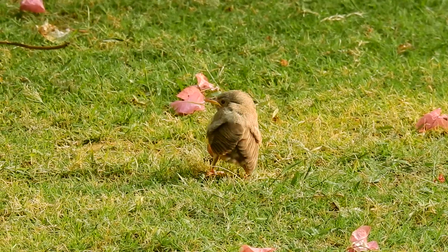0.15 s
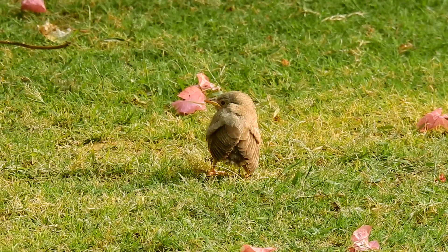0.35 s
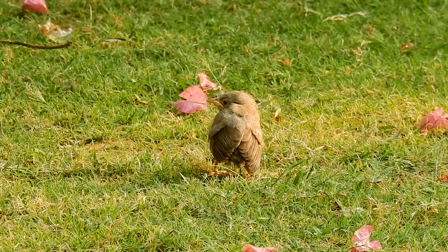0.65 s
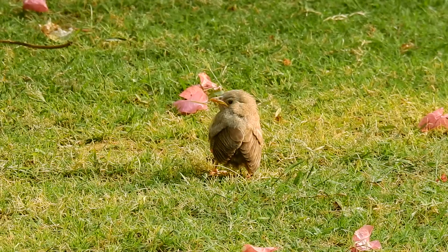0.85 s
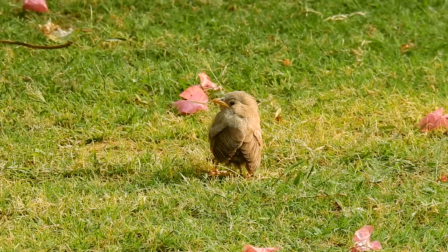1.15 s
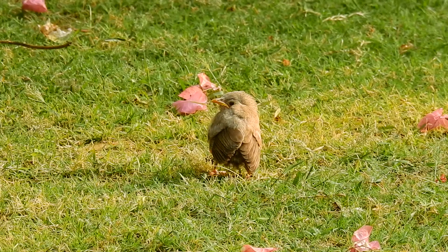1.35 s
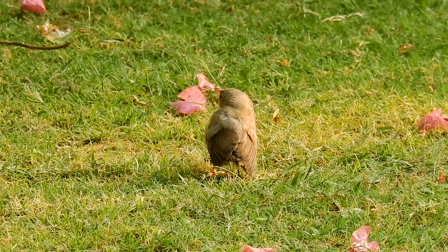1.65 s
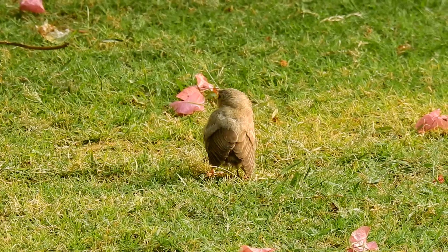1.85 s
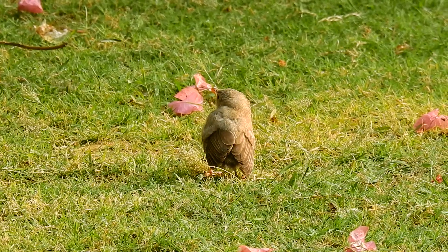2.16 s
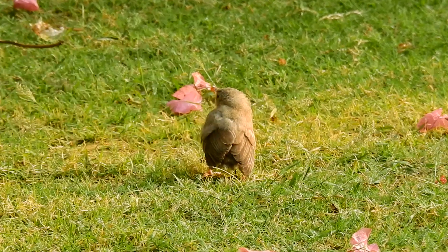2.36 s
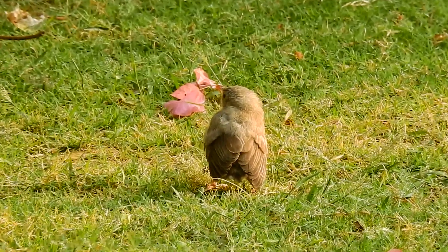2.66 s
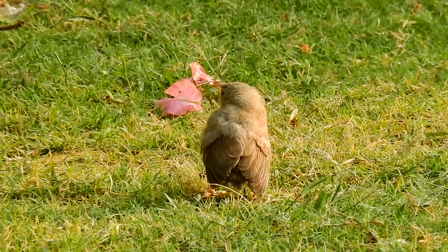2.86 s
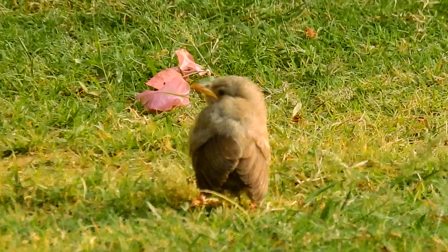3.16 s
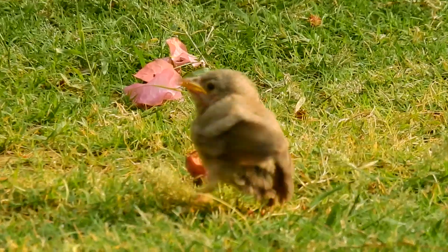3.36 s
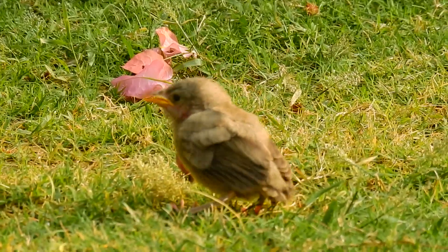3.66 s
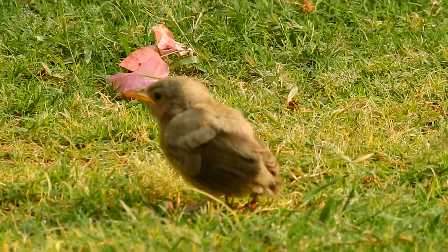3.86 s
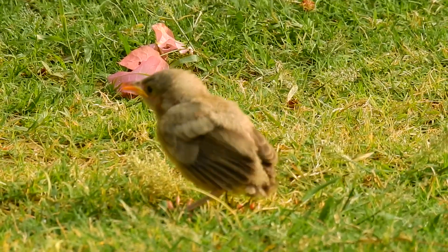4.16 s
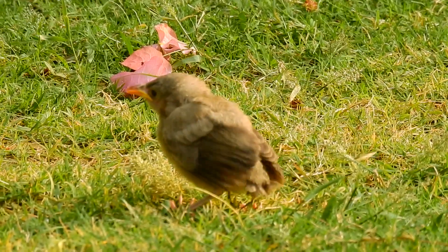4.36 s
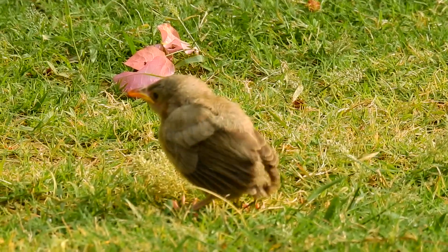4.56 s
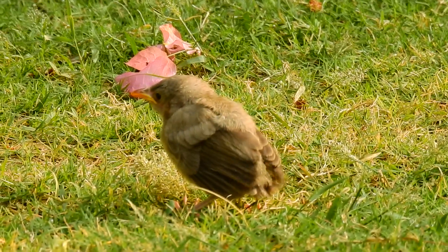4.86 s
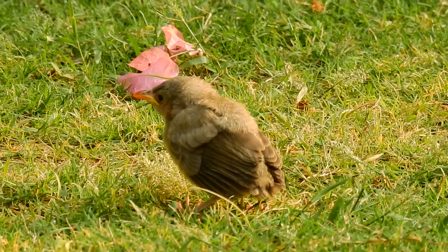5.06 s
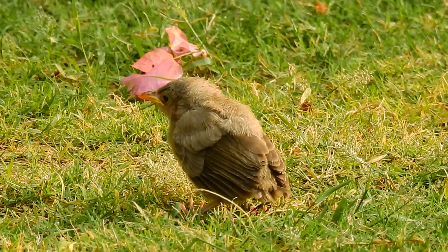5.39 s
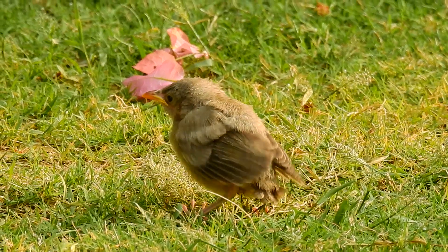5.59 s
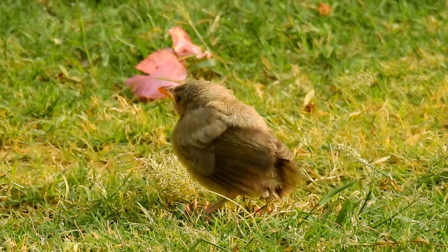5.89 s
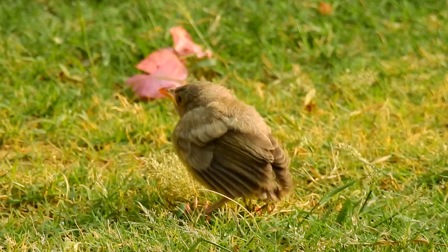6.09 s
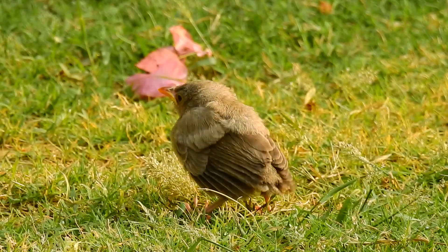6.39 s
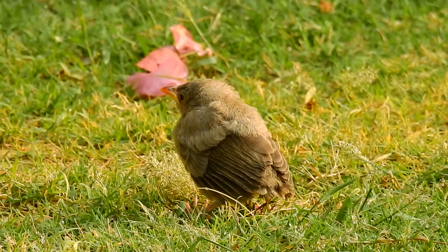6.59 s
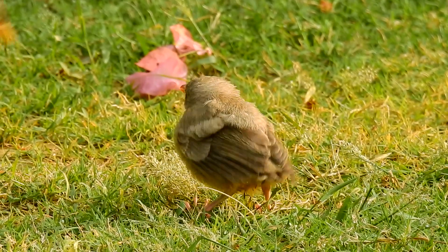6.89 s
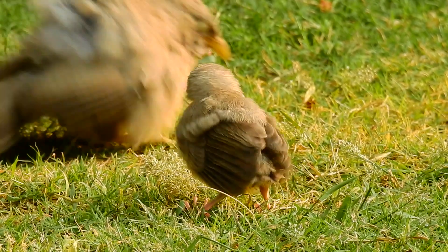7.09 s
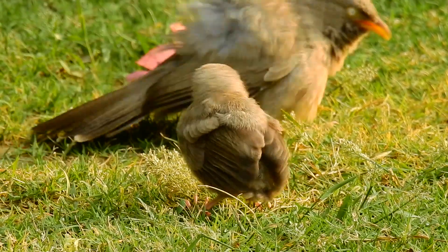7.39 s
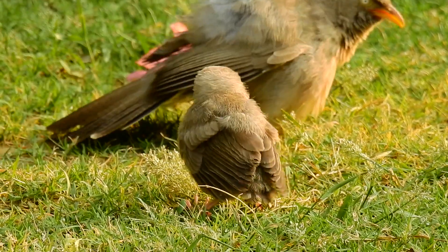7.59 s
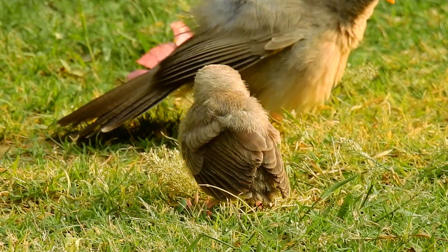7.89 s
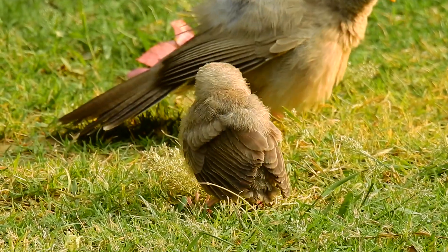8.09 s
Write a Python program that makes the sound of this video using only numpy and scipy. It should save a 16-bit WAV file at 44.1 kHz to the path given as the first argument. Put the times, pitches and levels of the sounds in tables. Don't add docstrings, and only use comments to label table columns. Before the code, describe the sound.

A garden with a small flock of babblers, over steady soft leaf hiss and a low town hum with faint engine swells; short echoes from walls and trees follow the calls. A faint thin whistle falls at 0.1 s, dry knocks click around 0.4-0.6, and a clearer whistle slides down at 0.7. Hoarse far crows and shrill buzzy chirps come at 0.9-1.4. A heavy low bump at 1.6 starts raspy scolding and quick chirps until 2. Lighter chirps and a strong falling whistle follow at 2.4-3.3. A nasal squawk at 3.4 leads to harsh swelling rasps, loudest at 3.7, then more at 4.05 and 4.3. Squawk, scold and whistle overlap near 4.9-5.3. It thins, with faint rustles, until a strong whistle at 6.5. At 7.0 a loud cry breaks into rasp, a sharp pip, chatter and grumbles, fading with faint whistles by 8.2.

```python
import sys
import numpy as np
from scipy import signal
from scipy.fft import rfft, irfft, next_fast_len
from scipy.io import wavfile
from scipy.ndimage import uniform_filter1d

SR = 44100
rng = np.random.default_rng(int(sys.argv[2]) if len(sys.argv) > 2 else 0)


def natural_amplitude(level_db):
    exponent = np.asarray(level_db, float) / 20
    return 10 ** exponent


def transcribe(signal):
    frames = np.atleast_2d(signal).T
    limited = np.clip(frames, -1, 1)
    pcm = np.round(limited * 32767).astype(np.int16)
    wavfile.write(sys.argv[1], SR, pcm)


N = 363384

# start_s, length_s, start_hz, end_hz, level_db
WHISTLES = [(0.086, 0.23, 3970, 3452, -50), (0.699, 0.33, 4048, 3390, -38.5),
            (2.591, .17, 3910, 3267, -44.5), (2.795, 0.36, 4120, 3375, -35.5),
            (5.316, 0.071, 3950, 3600, -54), (4.97, .36, 3953, 3330, -37), (5.42, .2, 3810, 3512, -46.5),
            (5.776, 0.11, 3820, 3420, -54.5), (6.219, .24, 3784, 3420, -55.5),
            (6.526, 0.42, 4040, 3326, -36), (7.484, .31, 3955, 3520, -47.5), (7.977, 0.23, 3747, 3380, -47)]
# start_s, length_s, start_hz, end_hz, level_db
BUZZES = [(7.42, .25, 2745, 2452, -44), (4.065, .11, 3050, 3200, -34), (4.345, .115, 3300, 3050, -35),
          (3.755, .09, 3250, 3500, -31), (7.35, .07, 3700, 3300, -38), (4.885, .07, 3700, 3400, -38),
          (.985, 0.094, 5610, 5870, -31.5), (1.015, 0.058, 7050, 7100, -45),
          (1.261, 0.11, 5590, 6220, -28.5), (2.345, .11, 5790, 5240, -36.5),
          (3.048, 0.058, 4414, 5090, -34.5), (3.79, .1, 11030, 11400, -56.5),
          (6.579, .12, 5360, 5940, -38.5), (7.803, 0.068, 4690, 5680, -48)]
# start_s, length_s, start_hz, end_hz, level_db
CHIRPS = [(1.885, 0.046, 4340, 4150, -42), (1.642, 0.09, 2500, 2445, -38.5), (8.05, .14, 2350, 2150, -54),
          (1.66, .14, 5000, 5200, -49), (4.93, 0.18, 2438, 2420, -41.5), (1.752, .045, 3000, 3200, -34),
          (1.775, .06, 3450, 3600, -36), (2.732, .064, 4510, 5050, -34), (2.768, .11, 4500, 4480, -43.5),
          (3.074, .082, 5130, 5280, -36.5), (3.076, .057, 4800, 4700, -44), (3.967, .08, 2880, 2950, -42),
          (4.265, 0.072, 2820, 2870, -45.5), (4.913, .12, 4510, 5260, -39.5),
          (5.99, 0.026, 5080, 4760, -51.5), (6.013, .073, 6500, 6380, -46.5), (6.473, .05, 2580, 2857, -41),
          (6.845, .045, 5000, 5220, -51.5), (7.35, .2, 2520, 2430, -39), (7.344, .12, 3570, 2810, -38.5),
          (7.37, .1, 3050, 2750, -41), (7.441, 0.26, 2165, 1960, -45)]
# start_s, length_s, start_hz, end_hz, level_db
GLIDES = [(2.41, .2, 3200, 3180, -46.5), (2.485, .05, 3220, 3200, -36), (7.008, .03, 8800, 7650, -50.5),
          (7.158, .035, 4280, 4470, -24), (6.66, .05, 6250, 6300, -46.5), (4.05, .15, 4400, 4350, -48),
          (3.52, .055, 2440, 2420, -35), (3.53, .05, 3350, 3250, -35), (4.51, .135, 3900, 3100, -42),
          (4.52, .08, 7600, 6500, -56), (1.57, .04, 6900, 6500, -56), (1.555, 0.04, 3520, 3400, -48),
          (1.585, .03, 3400, 3150, -40), (1.602, 0.068, 2060, 1973, -38), (1.595, 0.039, 1060, 1020, -43.5),
          (3.6, 0.095, 2450, 1883, -40), (3.62, .1, 3900, 3800, -42), (1.297, .04, 3640, 3260, -49.5),
          (1.77, 0.083, 2560, 2415, -36), (1.85, .091, 3580, 3770, -43.5), (1.905, 0.069, 2300, 2156, -41),
          (2.45, 0.18, 3904, 3820, -44.5), (2.543, 0.036, 4300, 5380, -47.5),
          (3.031, 0.043, 4100, 4480, -34), (3.229, 0.038, 2620, 2750, -46.5),
          (3.259, 0.065, 3610, 3760, -48), (4.48, .056, 5000, 5000, -46.5),
          (4.938, 0.11, 4140, 4020, -41.5), (5.148, .075, 2595, 2500, -37), (5.165, .03, 2400, 2400, -35),
          (7.006, 0.031, 4700, 3900, -35.5), (7.858, 0.046, 1724, 1466, -48.5)]
# start_s, length_s, pitch_hz, level_db
PIPS = [(1.713, 0.18, 5990, -50.5), (1.893, 0.06, 1702, -44.5), (2.412, 0.2, 3565, -44),
        (2.717, 0.037, 4430, -34.5), (2.755, 0.085, 5150, -33), (3.31, 0.099, 5500, -46.5),
        (3.81, .03, 1420, -40.5), (4.019, .067, 1606, -44.5), (4.872, 0.035, 2432, -38.5),
        (5.121, .027, 3675, -35), (5.318, .015, 1720, -48), (6.411, 0.071, 2387, -45.5),
        (6.5, 0.057, 2095, -46.5), (7.298, 0.05, 2485, -37), (7.328, .04, 2490, -29)]
# start_s, length_s, effort_db, brightness_db, pitch_hz
SQUAWKS = [
    (3.44, 0.12, -28, -16, 1246),
    (4.875, .085, -35, -18, 1226),
]
# start_s, length_s, effort_db, brightness_db, pitch_hz
CRIES = [
    (7.015, .15, -28.5, -17, 1274),
]
# start_s, length_s, effort_db, brightness_db, pitch_hz
GRUMBLES = [
    (7.33, 0.12, -35.5, -25.5, 620),
    (8.04, 0.13, -51, -37, 904),
]
# start_s, length_s, effort_db, brightness_db, throat_factor [ratio]
RASPS = [
    (7.08, .13, -33.5, -10.5, 1.02),
    (3.525, .09, -35, -17, 1.01),
    (3.6, 0.16, -36, -19.5, 0.93),
    (3.72, .21, -24, -9.5, 1.042),
    (4.045, 0.13, -30, -14, 0.984),
    (4.325, 0.135, -32, -12, 1.02),
]
# start_s, length_s, effort_db, brightness_db, throat_factor [ratio]
SCOLDS = [
    (.355, 0.034, -39.5, -11, 0.95),
    (1.645, 0.12, -33, -16.5, 0.87),
    (1.76, 0.1, -35, -23, 1.07),
    (1.86, 0.093, -40, -25, 0.99),
    (4.915, .13, -33.5, -21, 1.1),
]
# start_s, length_s, effort_db, brightness_db, throat_factor [ratio]
MUTTERS = [
    (3.97, .08, -49, -31, 0.6),
    (4.27, 0.044, -55, -28, .88),
]
# frequency_hz, level_db
THROAT = [(800, -24), (1250, -21), (1800, -15.5), (2200, -7.5), (2500, -2), (2850, -4), (3300, 0.5),
          (3950, -5.5), (4450, -7), (5100, -20.5), (6000, -19.5), (6800, -10), (7600, -30), (8400, -50.5),
          (14000, -81)]
# start_s, length_s, pitch_hz, level_db, first_overtone_db
CAWS = [(0.921, 0.086, 597, -30, -13.5), (0.995, 0.044, 707, -39, -7), (1.042, 0.055, 602, -31.5, -31),
        (1.17, .044, 558, -41, 0.3), (1.2, 0.1, 670, -43, -0.5), (1.261, .07, 639, -41.5, -11),
        (1.099, 0.058, 620, -46.5, -7), (1.345, 0.11, 619, -56.5, 6.5), (2.601, .45, 923, -55.5, -30),
        (3.292, .038, 910, -42.5, -27), (5.55, 0.071, 527, -51, 7), (5.632, 0.071, 546, -52, 6)]
# start_s, level_db, centre_hz, width_hz, t60_s
KNOCKS = [(.358, -37, 1434, 388, 0.12), (.372, -28, 1480, 300, 0.08), (.372, -32, 4290, 895, 0.094),
          (.365, -38.5, 717, 700, 0.11), (.58, -38.5, 6350, 3060, 0.19), (0.582, -37.5, 2625, 1200, 0.063),
          (0.635, -30, 2070, 1290, 0.035), (0.643, -42.5, 2100, 1320, 0.039),
          (0.469, -45, 3950, 4960, 0.13), (1.484, -40, 6000, 3500, 0.05), (1.486, -30, 2750, 450, 0.03),
          (1.49, -36, 4250, 500, 0.04), (1.638, -20, 600, 330, 0.03), (1.644, -17, 480, 300, 0.03),
          (1.652, -24, 520, 300, 0.07), (1.644, -32, 7070, 1290, 0.067), (1.642, -30, 4500, 900, 0.043),
          (3.299, -56, 8960, 4460, 0.13), (4.858, -46.5, 10150, 3600, 0.12), (5.1, -59.5, 9300, 3030, 0.12),
          (5.211, -53.5, 9800, 1980, 0.032), (5.53, -63, 4400, 2010, 0.048),
          (5.634, -43.5, 8160, 4480, 0.041), (6.184, -45, 7780, 4430, 0.084),
          (6.27, -59, 10300, 2900, 0.04), (6.799, -49.5, 9900, 3440, 0.088)]
# peak_s, level_db, half_length_s
REVS = [(.49, -52, 0.036), (0.67, -48.5, 0.088), (1.395, -43, 0.086), (1.736, -35.5, 0.027),
        (1.962, -37, 0.13), (2.431, -36.5, 0.098), (2.756, -46, 0.13), (3.04, -45, 0.16),
        (5.104, -55.5, 0.63), (5.84, -53, 0.088), (6.094, -56, .05), (6.799, -54, 0.5), (7.453, -57, 0.18),
        (8.12, -59, 0.051)]
# frequency_hz, level_db [dB per Hz]
HISS = [(29, -48.5), (50, -19.5), (91, -7.5), (139, -13.5), (180, 3), (306, -8), (605, -10), (815, -14.5),
        (1790, -17), (3550, -21), (6720, -20.5), (8140, -29.5), (10000, -46), (14500, -56)]
# time_s, level_db
BREEZE = [(0.0, -57), (0.99, -55), (1.12, -52.5), (1.4, -52.5), (1.9, -52), (2.27, -54.5), (3.1, -52),
          (3.51, -53), (3.72, -52.5), (4.8, -54.5), (5.69, -53), (5.9, -58), (6.33, -57.5), (7.14, -53.5),
          (8.24, -55.5)]
# frequency_hz, t60_s
GARDEN = [(300, 0.17), (2000, 0.22), (4500, 0.29), (8000, 0.15)]
# frequency_hz, likeness [0-1]
SAME = [(60, 0.97), (160, 1.0), (420, 0.98), (1100, 0.99), (2910, 0.85), (7690, 0.051)]
# frequency_hz, left_minus_right_db
TILT = [(60, -2.5), (160, 0.5), (420, 0.0), (1100, -2.5), (2910, -3.5), (7690, -1)]

NASAL = dict(throat=1.043, kept=.87, hold=.3, rough_start=.22, rough_end=.8, drift=.98,
             peak=.54, start_db=-14, end_db=-9, dull_db=-4)
CRY = dict(throat=1.163, kept=.84, hold=.37, rough_start=.06, rough_end=.8, drift=.95,
           peak=.62, start_db=-7.5, end_db=-4, dull_db=-8)
GRUMBLE = dict(throat=.94, kept=.88, rough_start=.3, rough_end=1, drift=.8,
               peak=.17, start_db=4, end_db=-13, dull_db=0)
RASP = dict(start_hz=567, kept=.95, rough_start=.66, rough_end=.97, drift=1.003,
            peak=.58, start_db=-10, end_db=-33, dull_db=-42)
SCOLD = dict(start_hz=516.4, kept=.94, rough_start=.8, rough_end=.67, drift=.884,
             peak=.23, start_db=-4, end_db=-7, dull_db=-4)
MUTTER = dict(start_hz=727, kept=1.2, rough_start=.35, rough_end=.6, drift=1.6,
              peak=.3, start_db=-1, end_db=-3, dull_db=6)

BUZZ_HZ, CHIRP_HZ, GLIDE_HZ, PIP_HZ = 497, 190, 85, 45
TOP_HZ = 8600
ECHO_DB, IDLE_DB = -4, -59.5
STARVE_DB, STARVE_HZ, SPARE_DB = -51, 8100, 16


def whistle(start_s, length_s, start_hz, end_hz, level_db):
    u = np.arange(0, 1, 1 / (length_s * SR))
    hz = start_hz + (end_hz - start_hz) * u ** .72
    shake_hz = np.interp(u, [0, .58, 1], [190, 40, 110])
    shake = np.sin(turns(115 + 25 * wobble(len(u), 14.8).real))
    angle = turns(hz + shake_hz * shake)
    flutter = .85 + .45 * wobble(len(u), 50)
    octave = natural_amplitude(-26.5 + .57 * (level_db + 44) - 9 * u)
    tone = flutter * (np.exp(1j * angle) + octave * np.exp(2j * angle))
    swell_db = arch(u, .6, -10, -9.5)
    return start_s, natural_amplitude(level_db + swell_db) * evened(tone.real) * signal.windows.tukey(len(u), .16)


def note(start_s, length_s, start_hz, end_hz, level_db, trill_hz):
    hz, swell = glide(length_s, start_hz, end_hz, early=.8 - .00039 * trill_hz)
    shake = swell * np.sin(turns(330 + 60 * wobble(len(hz), 60).real))
    flutter = .72 + .52 * wobble(len(hz), 70 + .25 * trill_hz)
    tone = np.exp(1j * turns(hz + trill_hz * shake)) * flutter
    return start_s, natural_amplitude(level_db) * swell * evened(tone.real)


def squawk(start_s, length_s, effort_db, bright_db, start_hz, throat, kept, rough_start, rough_end, drift,
           peak, start_db, end_db, dull_db, hold=.3):
    t = np.arange(0, length_s, 1 / SR)
    u = t / length_s
    effort_db = effort_db + arch(u, peak, start_db, end_db)
    bright_db = bright_db + arch(u, peak, dull_db, dull_db / 2)
    fall = np.sin(np.pi / 2 * np.clip((u - hold) / .45, 0, 1)) ** 2
    hz = start_hz * (1 + (kept - 1) * fall) * (1 + .007 * wobble(len(t), 25).real)
    rough = np.clip(rough_start + (rough_end - rough_start) * u, 0, 1)
    throat = throat * drift ** (2 * u - 1)
    angle, voice = turns(hz), 0
    for k in range(1, int(TOP_HZ / hz.min())):
        clear = np.sqrt(1 - rough) * (1.06 + .5 * wobble(len(t), 27))
        rasp = np.sqrt(rough) * wobble(len(t), 210) * natural_amplitude(2.5 * wobble(len(t), 30).real)
        lift_db = (bright_db + 16.5) * np.clip(k * hz / 2000 - 2, 0, 1)
        overtone = ((clear + rasp) * np.exp(1j * k * angle)).real
        voice = voice + natural_amplitude(read(THROAT, k * hz / throat) + lift_db) * overtone
    gusts = (.4 * wobble(len(t), 60) + .8 * wobble(len(t), 260)).real
    puffs = evened(natural_amplitude(6 * rough * np.tanh(gusts)))
    edges = signal.windows.tukey(len(t), .3)
    return start_s, natural_amplitude(effort_db) * voice * np.sqrt(hz / 1200) * puffs * edges


def caw(start_s, length_s, start_hz, level_db, second_db):
    hz, swell = glide(length_s, start_hz, 1.035 * start_hz)
    angle, voice = turns(hz), 0
    for k, overtone_db in enumerate([0, second_db, second_db - 16.5], 1):
        hoarse = .45 + .9 * wobble(len(hz), 60 * k)
        voice = voice + natural_amplitude(overtone_db) * np.exp(1j * k * angle) * hoarse
    return start_s, natural_amplitude(level_db) * swell * voice.real


def knock(start_s, level_db, hz, width_hz, t60_s):
    t = np.arange(0, .15, 1 / SR)
    same = np.clip(read(SAME, hz), -1, 1)
    left = wobble(len(t), width_hz / 2)
    right = same * left + np.sqrt(1 - same ** 2) * wobble(len(t), width_hz / 2)
    grit = [left, right] * np.exp(2j * np.pi * hz * t)
    return start_s, natural_amplitude(level_db - 60 * t / t60_s) * np.minimum(t / .0019, 1) * grit.real


def hum():
    t = np.arange(N) / SR
    hz = 165 + 4 * wobble(N, 1.5).real
    level = natural_amplitude(IDLE_DB)
    for peak_s, level_db, half_s in REVS:
        level = level + natural_amplitude(level_db) * np.exp(-((t - peak_s) / half_s) ** 2)
    return level * evened((wobble(N, 21) * np.exp(1j * turns(hz))).real)


def hiss():
    frames, hz = N // 512 + 5, np.fft.rfftfreq(1024, 1 / SR)
    a, b, c, d, patches = rng.standard_normal((frames, 513, 5)).T
    patches = evened(uniform_filter1d(uniform_filter1d(patches, 14, 0), 10, 1))
    same = np.clip(read(SAME, hz), -1, 1)[:, None]
    left = a + 1j * b
    z = np.array([left, same * left + np.sqrt(1 - same ** 2) * (c + 1j * d)])
    z *= natural_amplitude(read(HISS, hz)[:, None] + 2.58 * patches)
    noise = signal.istft(z, nperseg=1024, noverlap=512)[1][:, :N]
    swell_db = np.interp(np.arange(N) / SR, *np.transpose(BREEZE))
    return natural_amplitude(swell_db + 6) * evened(noise)


def placed(start_s, sound):
    side = rng.uniform(-1, 1)
    late = np.sinc(np.arange(-8, 9) - .8 * side * np.array([[1], [-1]]))
    level = natural_amplitude(1.7 * side * np.array([[-1], [1]]))
    return start_s - 8 / SR, signal.oaconvolve(sound[None], late, axes=1) * level


def garden(x):
    taps = np.zeros((2, SR))
    at = np.arange(300, SR - 20, 20) + rng.integers(0, 20, (2, (SR - 301) // 20))
    np.put_along_axis(taps, at, rng.choice([-1., 1.], at.shape), 1)
    hz, t, z = signal.stft(taps, SR, nperseg=256)
    same = np.clip(read(SAME, hz), -1, 1)[:, None]
    z[1] = same * z[0] + np.sqrt(1 - same ** 2) * z[1]
    decay = natural_amplitude(-60 * t / read(GARDEN, hz)[:, None])
    tail = signal.istft(z * decay, SR, nperseg=256)[1]
    return signal.fftconvolve(x[None], tail / np.linalg.norm(tail[0]), axes=1)[:, :N]


def glide(length_s, start_hz, end_hz, early=.8):
    u = np.arange(0, 1, 1 / (length_s * SR))
    swell = np.sin(np.pi * u ** early) ** 1.2
    return start_hz + (end_hz - start_hz) * np.sin(np.pi / 2 * u) ** 1.1, swell


def arch(u, peak, start, end):
    peak = np.clip(peak, .05, .95)
    return np.where(u < peak, start * (1 - u / peak) ** 2, end * ((u - peak) / (1 - peak)) ** 2)


def wobble(count, hz):
    size = next_fast_len(count + 600)
    z = rng.standard_normal((size, 2)) @ [1, 1j]
    bell = np.exp(-.5 * (np.fft.fftfreq(size, 1 / SR) / hz) ** 2)
    return evened(np.fft.ifft(z * bell))[:count]


def turns(hz):
    return 2 * np.pi * np.cumsum(hz) / SR


def evened(x):
    return x / np.sqrt(np.mean(abs(x) ** 2) + 1e-20)


def read(points, hz):
    f, value = np.transpose(points)
    return np.interp(np.log(hz + 1), np.log(f + 1), value)


def add(mix, start_s, sound):
    part = mix[..., round(start_s * SR):][..., :sound.shape[-1]]
    part += sound[..., :part.shape[-1]]


def scene():
    calls = [whistle(*row) for row in WHISTLES]
    calls += [note(s, length_s, hz, hz, db, PIP_HZ) for s, length_s, hz, db in PIPS]
    for rows, trill_hz in [(BUZZES, BUZZ_HZ), (CHIRPS, CHIRP_HZ), (GLIDES, GLIDE_HZ)]:
        calls += [note(*row, trill_hz) for row in rows]
    for rows, voice in [(SQUAWKS, NASAL), (CRIES, CRY), (GRUMBLES, GRUMBLE)]:
        calls += [squawk(*row, **voice) for row in rows]
    for rows, voice in [(RASPS, RASP), (SCOLDS, SCOLD), (MUTTERS, MUTTER)]:
        calls += [squawk(*row, throat=throat, **voice) for *row, throat in rows]
    direct, all_round = np.zeros((2, N)), np.zeros(N)
    for call in calls:
        add(direct, *placed(*call))
        add(all_round, *call)
    for start_s, sound in [caw(*row) for row in CAWS] + [knock(*row) for row in KNOCKS]:
        add(direct, start_s, sound)
        add(all_round, start_s, natural_amplitude(-3) * np.atleast_2d(sound)[0])
    return direct + natural_amplitude(ECHO_DB) * garden(all_round) + hum() + hiss()


def starved(x):
    hz, _, z = signal.stft(x, SR, nperseg=2048, noverlap=1024)
    power = (abs(z) ** 2).mean(0)
    call_db = 10 * np.log10(power[(hz > 5500) & (hz < 8000)].sum(0) + 1e-20)
    band_db = 10 * np.log10(uniform_filter1d(power, size=24, axis=0) + 1e-20)
    faint = band_db < np.median(band_db, axis=1)[:, None] + SPARE_DB
    dropped = np.clip((call_db - STARVE_DB) / 2, 0, 1) * faint * (hz > STARVE_HZ)[:, None]
    return signal.istft(z * (1 - dropped), SR, nperseg=2048, noverlap=1024)[1][:, :N]


def low_pass(x):
    return signal.sosfilt(signal.butter(12, 14400, fs=SR, output="sos"), x)


def record(dry):
    hz = np.fft.rfftfreq(N, 1 / SR)
    tilt_db = read(TILT, hz) * [[.5], [-.5]]
    low_cut = 1 / np.sqrt(1 + (58 / (hz + 1)) ** 8)
    heard = irfft(rfft(dry) * natural_amplitude(tilt_db) * low_cut, N)
    mix = starved(heard)
    return low_pass(mix)


dry = scene()
out = record(dry)
transcribe(out)
```